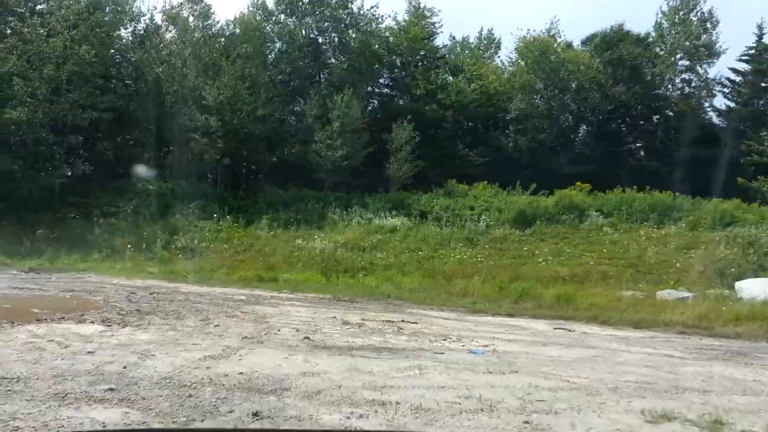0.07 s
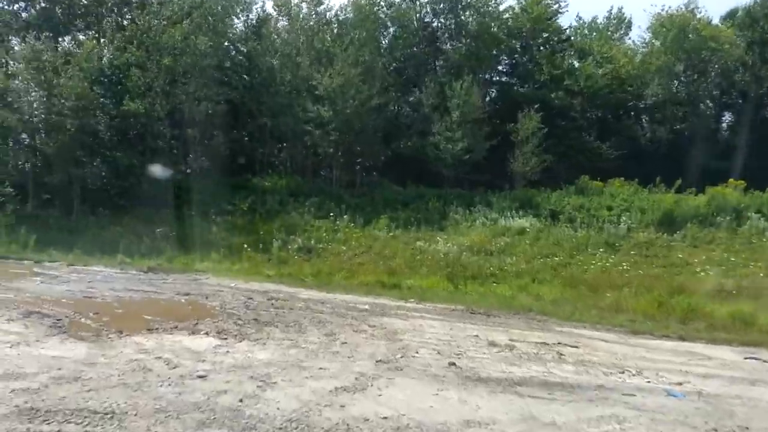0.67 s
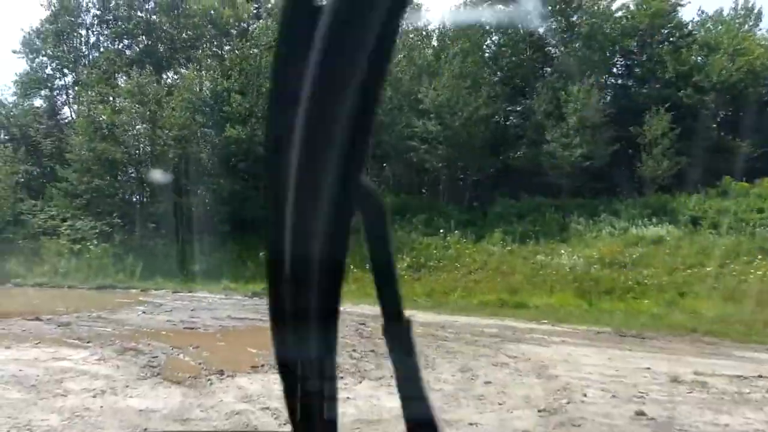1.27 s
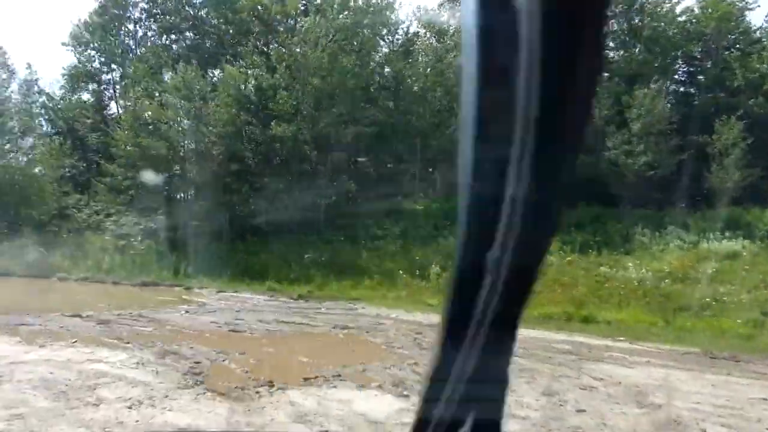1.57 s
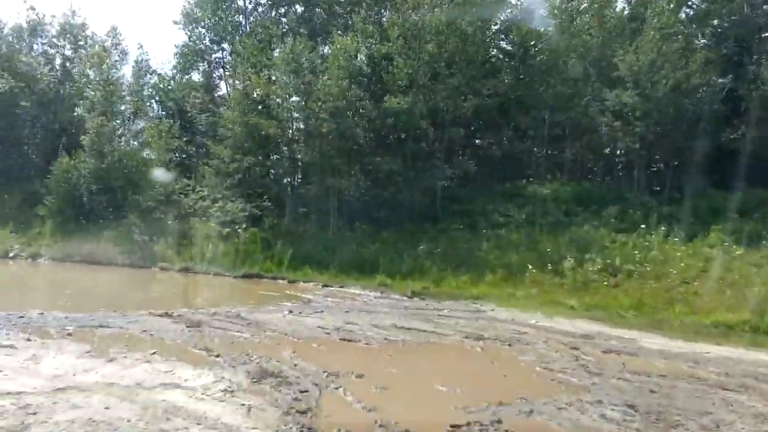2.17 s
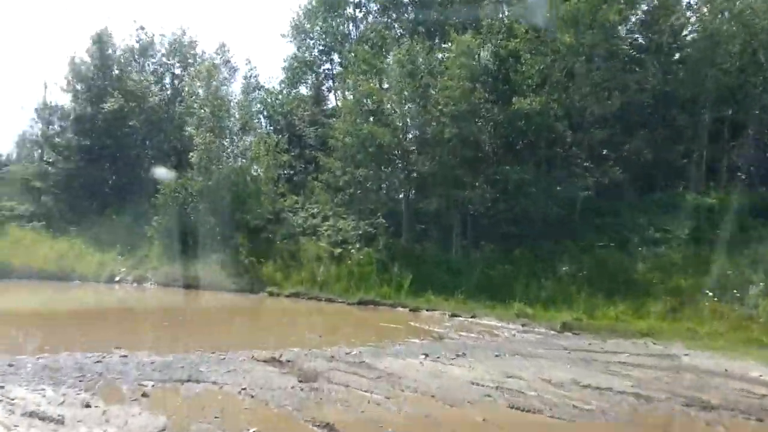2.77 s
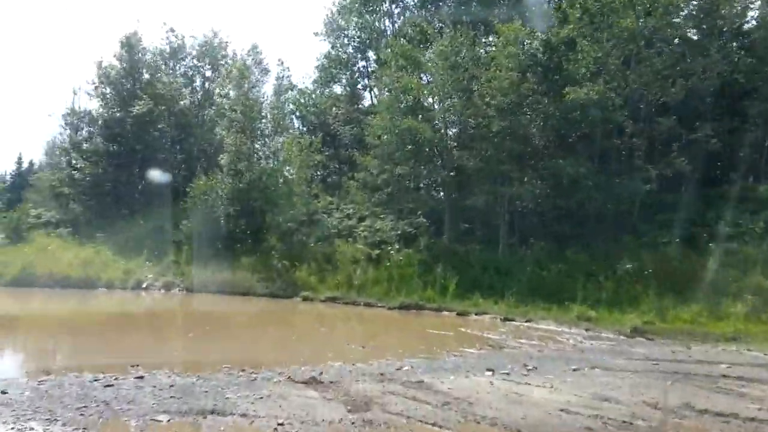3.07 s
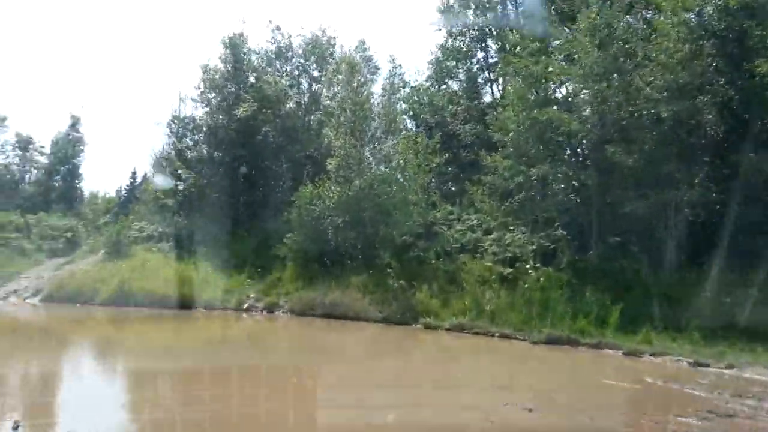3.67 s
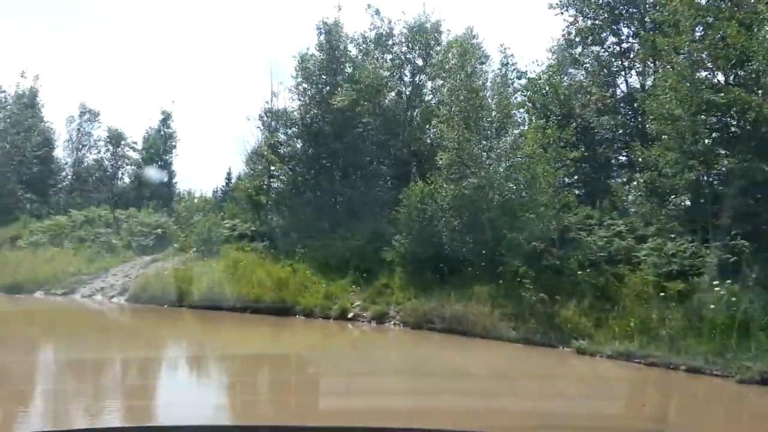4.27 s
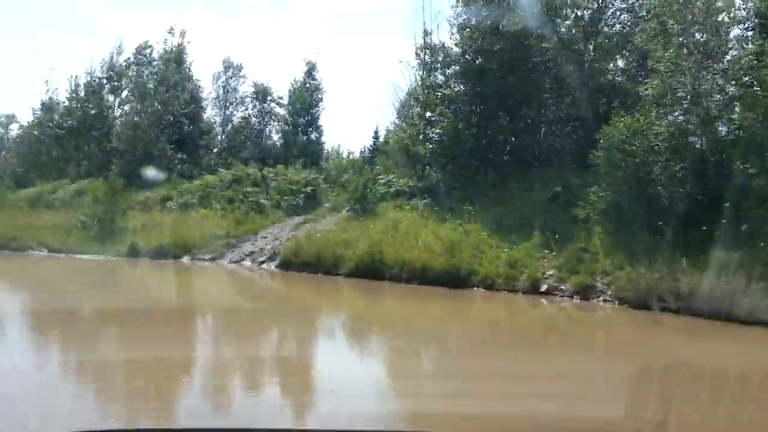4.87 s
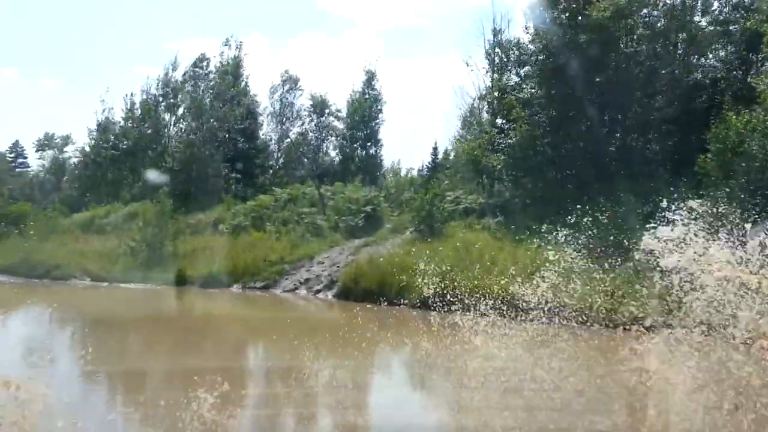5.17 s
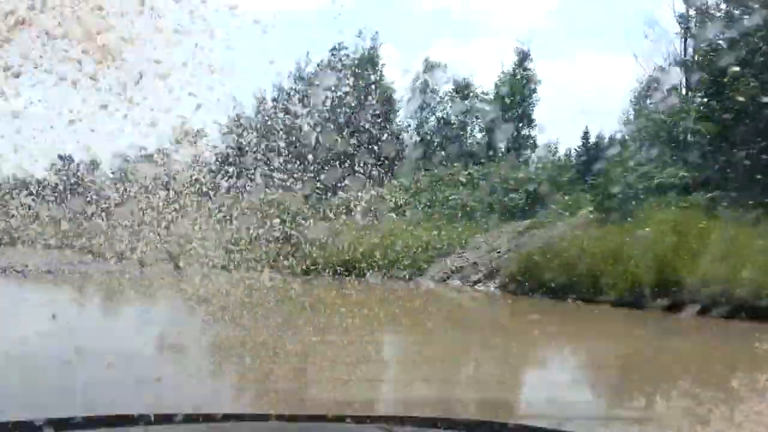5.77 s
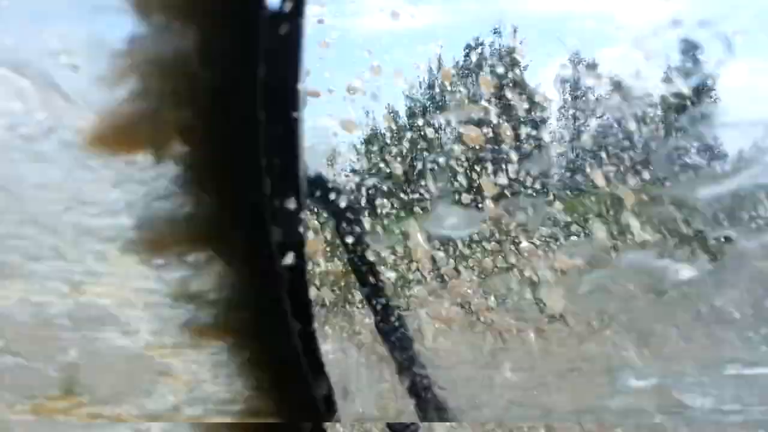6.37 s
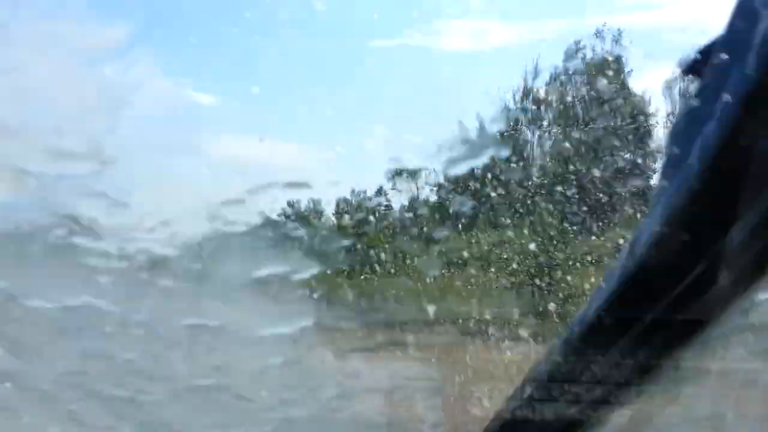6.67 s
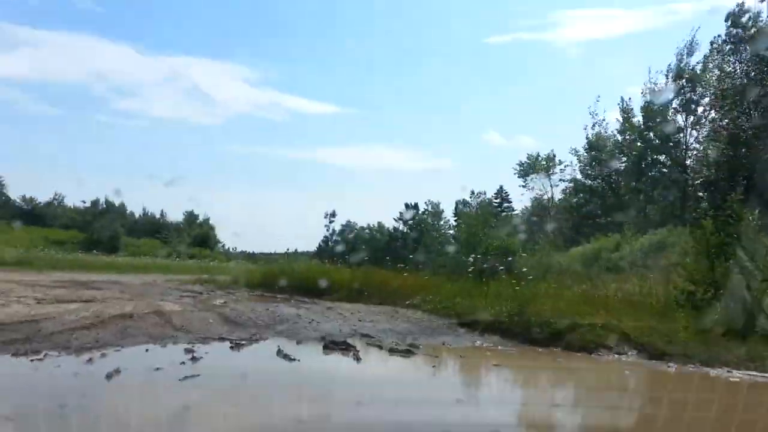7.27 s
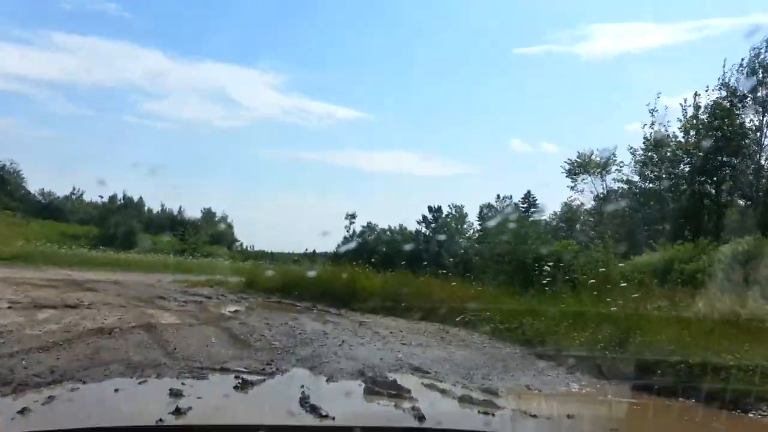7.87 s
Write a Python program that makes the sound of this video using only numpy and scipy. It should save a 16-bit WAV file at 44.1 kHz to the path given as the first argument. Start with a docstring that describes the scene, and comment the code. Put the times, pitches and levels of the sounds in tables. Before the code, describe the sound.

An off-road vehicle hums, rumbles and rattles along a dirt track, heard from inside, then splashes through a muddy puddle that splatters the windscreen.

```python
"""Inside the cab of an off-road vehicle on a rough dirt track. After a short silence the drive cuts in: the
engine hums, tyres rumble and crunch, blows thump the floor and loose trim rattles. A small motor whines
faintly, and twice its tone jumps up into a squeal. Just after five seconds, with a creak, the wheels plunge
into a muddy puddle: water slams the floor, spray rains on the body, gobs splat on the windscreen, and the
engine drones under load as it pulls through."""
import sys
import numpy as np
from scipy import signal
from scipy.fft import rfft, irfft, next_fast_len
from scipy.io import wavfile

SR = 44100
rng = np.random.default_rng(int(sys.argv[2]) if len(sys.argv) > 2 else 0)


def dump(signal):
    """Clip the signal to [-1, 1] and save it as 16-bit WAV at the path in sys.argv[1]."""
    limited = np.clip(np.atleast_2d(signal).T, -1, 1)
    pcm = np.round(limited * 32767).astype(np.int16)
    wavfile.write(sys.argv[1], SR, pcm)


N = 348831
TIME = np.arange(N) / SR
BODY_LEFT_DB = -0.33   # the floor and the engine sit a touch to the right

# Hollow colour of the drummed floor and cab: frequency_hz, level_db
DRUM_COLOUR = [(50, -73), (110, 0), (170, -3.5), (255, -4.5), (340, -4), (400, -9.5), (500, -8.5),
               (700, -15.5), (1000, -18.5), (1600, -26.5), (4000, -31.5)]
# Bright colour of a hard tick: frequency_hz, level_db
TICK_COLOUR = [(3000, 4.5), (5300, 4.5), (6500, -2.5), (8500, -2), (10500, -4.5), (14500, -8)]


def from_db(db):
    """Decibels to gain."""
    return 10 ** (np.asarray(db) / 20)


def pan(left_db):
    """Stereo gains that put the left channel left_db above the right."""
    return from_db([[left_db / 2], [-left_db / 2]])


def rms_one(x):
    """Scale to unit power."""
    return x / np.sqrt(np.mean(x ** 2) + 1e-20)


def curve(points):
    """Automation: straight lines through (time, value) points."""
    return np.interp(TIME, *np.transpose(points))


def held(start_s, length_s, attack_s, release_s):
    """Rise, hold and release between 0 and 1."""
    return np.clip(np.minimum((TIME - start_s) / attack_s, (start_s + length_s - TIME) / release_s), 0, 1)


def decay(t60, size, attack_s=1e-6):
    """Percussive envelope: a rise, and a fall of 60 dB in t60 seconds."""
    return from_db(-60 * TIME[:size] / t60) * (1 - np.exp(-TIME[:size] / attack_s))


def drift(rate_hz):
    """Smooth random wander of spread 1."""
    step, settle = 40, 2000
    pole = np.exp(-2 * np.pi * rate_hz * step / SR)
    white = rng.standard_normal(N // step + settle + 2)
    slow = signal.lfilter([1], [1, -2 * pole, pole * pole], white)[settle:]
    return np.interp(np.arange(N) / step, np.arange(len(slow)), rms_one(slow))


def noise(size=N):
    """Two unrelated white noises."""
    return rng.standard_normal((2, size))


def add(out, start_s, sound):
    """Mix a sound in at a time."""
    i = min(round(start_s * SR), N)
    out[:, i:i + sound.shape[-1]] += sound[..., :N - i]


def in_cab(pair, colour, mic_spacing_m=0.16):
    """Colour two unrelated signals into a diffuse field, centred in the bass and wide on top; rms 1."""
    size = next_fast_len(pair.shape[1], True)
    hz = np.maximum(np.arange(size // 2 + 1) * SR / size, 1)
    points_hz, points_db = np.transpose(colour)
    gain = from_db(np.interp(np.log(hz), np.log(points_hz), points_db))
    gain /= 1 + (hz / points_hz[-1]) ** 4 + (points_hz[0] / hz) ** 4   # roll off both ends
    coherence = .98 * np.sinc(2 * hz * mic_spacing_m / 343)
    spectrum = rfft(pair, size) * gain * np.sqrt([1 + coherence, 1 - coherence])
    mid, side = irfft(spectrum, size)[:, :pair.shape[1]]
    return rms_one(np.array([mid + side, mid - side]))


def grains(per_s, spread_db, t60, size=1536, panels=8):
    """Random small impacts of uneven strength, dealt to several briefly ringing panels; rms 1."""
    strength = from_db(spread_db * np.minimum(rng.exponential(1, N), 4)) * rng.choice([-1, 1], N)
    hits = strength * (rng.random(N) < per_s / SR) / np.sqrt(per_s)
    panel, out = rng.integers(0, panels, N), 0
    for k in range(panels):
        ring = noise(size) * decay(t60, size)
        out += signal.oaconvolve([hits * (panel == k)], ring, axes=1)[:, :N]
    return rms_one(out)


def pings(per_s, low_hz, high_hz, cycles, pitches=20):
    """Random pitched taps that ring for some cycles, scattered in stereo; rms 1."""
    taps = (rng.random(N) < per_s / SR) * from_db(3.4 * np.minimum(rng.exponential(1, N), 3))
    pitch, out = rng.integers(0, pitches, N), 0
    scattered = taps * rng.uniform(-0.97, 1, (2, N))
    for k, hz in enumerate(np.geomspace(low_hz, high_hz, pitches)):
        pole, angle = from_db(-60 * hz / (cycles * SR)), 2 * np.pi * hz / SR
        resonator = [0, np.sin(angle)], [1, -2 * pole * np.cos(angle), pole * pole]
        out += signal.lfilter(*resonator, scattered * (pitch == k) + 1e-18)
    return rms_one(out)


def struck(modes, size, pitch_scale=1):
    """Modes that ring down, each with a new strength for every touch and channel."""
    out = 0
    for pitch, db, t60 in modes:
        ring = np.sin(2 * np.pi * pitch * pitch_scale * TIME[:size]) * decay(t60, size, attack_s=0.00065)
        out += from_db(db) * rng.uniform(-1.35, 1.63, (2, 1)) * ring
    return out


def thin_tone(hz, waver, flicker_db):
    """A sine, unsteady in pitch and level, with its own phase in each channel."""
    phase = 2 * np.pi * np.cumsum(hz * (1 + waver * drift(30.6))) / SR
    level = np.sqrt(2) * from_db(flicker_db * drift(16))
    return level * np.sin(phase + rng.uniform(0, np.pi / 2, (2, 1)))


def motor_whine(gripping):
    """A small electric motor whines faintly; its tone gives way while it jumps up into the squeals, and dips
    under the creak."""
    # Partials of the motor: pitch_hz, level_db, duck_db
    partials = [(1716, -70, -4), (2026, -62, -16), (2340, -72, -5), (2680, -65.5, -5)]
    # Swell of the whine: time_s, gain_db
    swell = [(.8, -14), (1.4, 9), (2.3, 14.5), (3.15, 13.5), (3.8, 5), (7.9, 9.5)]
    whine = sum(from_db(db + duck_db * gripping) * thin_tone(hz, waver=0.0042, flicker_db=3)
                for hz, db, duck_db in partials)
    return from_db(curve(swell)) * whine


def squeals(sag_hz=65):
    """The motor's tone jumps up into squeals, and a part creaks: each catches, glides and sags in pitch as it
    lets go; returns the sound and its grip."""
    # Two squeals and a creak: start_s, length_s, pitch_hz, glide_hz_per_s, full_grip_db, waver_share
    rubs = [(2.357, 0.28, 2168, -120, -42, 0.00494), (2.8, 0.53, 2130, -65, -42, 0.0066),
            (5.204, 0.05, 713, 1602, -18.5, 0.0225)]
    out, gripping = 0, 0
    for start_s, length_s, hz, glide, db, waver in rubs:
        grip = held(start_s, length_s, attack_s=0.0394, release_s=0.048)
        pitch_hz = hz + glide * np.clip(TIME - start_s, 0, length_s) - sag_hz * (1 - grip)
        out += from_db(db) * grip * thin_tone(pitch_hz, waver, flicker_db=1.3)
        gripping = np.maximum(gripping, grip)
    return out, gripping


def engine():
    """The firing tone grows with load and near the cab's resonance; uneven firing makes it flutter."""
    # Engine speed: time_s, firing_hz
    speed = [(.95, 87), (1.42, 105.5), (2.35, 110), (2.65, 108), (3.35, 117), (3.72, 106.3), (4.52, 99),
             (4.9, 111.5), (5.3, 117), (5.55, 114), (5.85, 129.5), (6.12, 129.7), (6.4, 135), (6.7, 129.8),
             (6.92, 124), (7.28, 139), (7.55, 140.5), (7.88, 121)]
    # Engine load, as the firing tone before the cab's boost: time_s, level_db
    load = [(.9, -35), (1.3, -32.5), (2.4, -37.5), (2.95, -38), (3.7, -33.5), (4.0, -30.5), (5.25, -36),
            (5.55, -25), (5.72, -30), (5.86, -25), (6.2, -21.5), (6.65, -25.5), (6.95, -25), (7.2, -27),
            (7.38, -26), (7.9, -31)]
    # Overtones at mean load: firing_multiple, level_db
    overtones = [(2, -32), (2.5, -36.5), (3, -36), (3.5, -43), (4, -41), (5, -47)]
    cab_hz, cab_half_width_hz, cab_boost_db = 126.4, 14.8, 10.5
    firing_hz, load_db = curve(speed), curve(load)
    boom_db = cab_boost_db / (1 + ((firing_hz - cab_hz) / cab_half_width_hz) ** 2)
    phase = 2 * np.pi * np.cumsum(firing_hz * (1 + 0.00333 * drift(6.8))) / SR
    out = from_db(load_db + boom_db + 0.57 * drift(4.6)) * np.sin(phase)
    hum_db = 0.3 * (load_db - load_db.mean())   # overtones follow only part of the load's swing
    for multiple, db in overtones:
        flutter_db = 2 * drift(4.7)
        out += from_db(db + hum_db + flutter_db) * np.sin(multiple * phase + rng.uniform(0, 2 * np.pi))
    return out


def tyres(wading, spray):
    """Ruts boom through the body, the tread rumbles, grit and flung mud crunch and hiss, pebbles tap."""
    # Depth of the ruts, as the body's boom: time_s, level_db
    ruts = [(.8, -41), (1.9, -41), (2.6, -36.5), (3.1, -33), (3.72, -31.5), (4.12, -34), (4.38, -43),
            (4.7, -38), (5.6, -31), (5.85, -36), (6.4, -30), (7.1, -35.5), (7.28, -26.5), (7.74, -41),
            (7.88, -38)]
    # How hard the ground shakes the body: time_s, level_db
    shake = [(.8, -44.5), (1.9, -42.5), (2.6, -39.5), (3.1, -33.5), (3.72, -34.5), (4.15, -38.5),
             (4.42, -44), (4.68, -33), (5.0, -30.5), (5.5, -28), (5.9, -32), (6.45, -28), (7.05, -43),
             (7.33, -28), (7.7, -44)]
    # Looseness of the gravel, as its hiss: time_s, level_db
    gravel = [(.8, -36.5), (1.2, -38), (1.6, -36.5), (2.25, -36.5), (2.65, -36.6), (3.2, -36.5),
              (3.55, -35.2), (3.85, -36.5), (4.4, -36.5), (4.7, -35.5), (5.0, -35.5), (5.8, -36.5),
              (7.9, -36)]
    # Deep boom of the body: frequency_hz, level_db
    boom_colour = [(20, -50), (32, -42), (42, -22), (54, -12), (80, -12.5), (105, -37), (140, -39),
                   (250, -58)]
    # Rumble of the tread: frequency_hz, level_db
    rumble_colour = [(50, -27), (95, -3), (130, -2), (168, -6.5), (210, -1.3), (245, -0.2), (295, -4.5),
                     (335, -2.5), (420, -7.5), (560, -10.5), (760, -13), (1000, -20), (1600, -29.5),
                     (4000, -53)]
    # Crunch of the grit: frequency_hz, level_db
    grit_colour = [(400, 4), (900, -5), (1250, 0), (1550, -0.5), (2200, -1.5), (3200, -6), (4500, -7.5),
                   (5800, -12.5), (8200, -12.5), (10000, -18.5), (11000, -22.5), (12000, -28.5),
                   (15000, -50)]
    usual_shake_db, cushion_db, mud_db = -34, -0.5, -11   # water cushions the tread; spray carries mud
    bumps_db = drift(7.7)
    boom = from_db(curve(ruts)) * in_cab(noise(), boom_colour)
    rumble_db = -22 + 0.24 * (curve(shake) - usual_shake_db) + cushion_db * wading + bumps_db
    rumble = from_db(rumble_db) * in_cab(noise(), rumble_colour)
    grit_gain = np.hypot(from_db(curve(gravel) + 0.49 * bumps_db), from_db(mud_db) * spray)
    crunch = noise() + from_db(-6 + 1.7 * drift(15)) * grains(per_s=400, spread_db=3.5, t60=0.032)
    pebbles = from_db(-12.8) * pings(per_s=170, low_hz=1600, high_hz=5300, cycles=27)
    return (boom + rumble) * pan(BODY_LEFT_DB) + grit_gain * (in_cab(crunch, grit_colour) + pebbles)


def knock(ring_db, clack_db, tick_db, part_hz, size):
    """One touch of loose trim: a dull clack, plus a metallic ring and a tick that open with a crack."""
    # Dull clack of the trim: frequency_hz, level_db
    clack_colour = [(300, 4), (600, 14.5), (850, 1.5), (1200, 7.5), (1600, 3), (2050, 4), (2600, -7),
                    (2880, -8), (3150, 1.5), (5000, -24)]
    # Modes that stand out of the clack: pitch_ratio, level_db, t60_s
    trim_modes = [(.525, -7.5, .09), (.72, -8, 0.07), (.79, -8.5, 0.085), (.9, -9, 0.051), (.98, -4, .05),
                  (1.005, -6.5, 0.048), (1.04, -2.5, 0.047)]
    # Metallic sheen of the ring: frequency_hz, level_db
    ring_colour = [(1200, -22), (2500, -24), (2950, 11), (3300, 6), (3800, 7), (4150, 6.5), (4800, 5.5),
                   (5500, -2.5), (8000, -3.5), (9800, -9), (12000, -37)]
    # Metal fittings that the trim strikes: pitch_hz, level_db, t60_s
    metal_modes = [(2943, -3.5, 0.072), (3000, -5, 0.082), (3610, -13, .07), (3980, -9, .07),
                   (4450, -10, .07), (4760, -6, .07), (5200, -10, .06)]
    crack = from_db(-3.5) * decay(0.013, size, attack_s=0.0002)
    clack = in_cab(noise(size), clack_colour) * decay(0.13, size, attack_s=0.00091)
    clack += struck(trim_modes, size, part_hz)
    ring = in_cab(noise(size), ring_colour) * (decay(0.1, size, attack_s=0.00063) + crack)
    ring += struck(metal_modes, size)
    tick = in_cab(noise(size), TICK_COLOUR) * (decay(0.06, size) + crack)
    return from_db(clack_db - 0.55) * clack + from_db(ring_db - 1.25) * ring + from_db(tick_db) * tick


def rattles(size=4096, bounce_db=-9, snap_s=7.5575):
    """Loose parts knock and bounce once, weaker; near the end one hard tick snaps close by."""
    # Knocks of loose trim and stones: start_s, ring_db, clack_db, tick_db, pitch_hz
    knocks = [(.849, -45, -37, -38, 2600), (0.888, -47, -48, -35, 2600), (1.1821, -33.5, -27.5, -35, 2080),
              (1.2566, -29, -27, -39, 2270), (1.402, -38, -42, -41, 2580), (1.517, -31, -27.5, -48, 2670),
              (1.557, -34, -26, -29, 2040), (1.992, -32, -52, -34, 2600), (2.1555, -40, -35, -39, 2620),
              (2.2918, -40, -26, -60, 2500), (2.4076, -41, -26, -59, 2500), (2.857, -36, -31, -40, 2300),
              (3.0327, -29.5, -23, -28.5, 2220), (3.1975, -32.5, -21.5, -52, 2570),
              (3.3712, -34, -29.5, -37, 2610), (3.4705, -32, -18.5, -48, 2560),
              (3.688, -35, -31, -55, 2800), (3.7147, -37, -25, -56, 2370), (3.733, -39, -26, -57, 2700),
              (4.036, -37, -27, -58, 2480), (4.078, -34, -30, -43, 2580), (4.12, -45, -42, -37, 2600),
              (4.157, -37, -35, -48, 2600), (4.5756, -32, -24, -39, 2500), (4.5844, -36, -28, -35, 2390),
              (4.6418, -28.5, -32, -55, 2740), (4.79, -30.5, -42, -57, 2700), (4.9078, -35, -27, -32, 2650),
              (4.9357, -32, -27.5, -49, 2710), (5.305, -34, -24.5, -35, 2280),
              (5.6073, -25, -31, -30, 2600), (5.6524, -29, -24.5, -32.5, 2530),
              (5.752, -28.5, -26, -27, 2390), (6.015, -23, -25, -34, 2680), (6.202, -27, -26, -28, 2600),
              (6.2104, -32, -28, -31, 2490), (6.3216, -20.5, -26, -39, 2530),
              (6.5086, -31, -24.5, -28, 2580), (7.058, -28, -27, -36, 2600), (7.1933, -20, -26, -30, 2710),
              (7.209, -33, -40, -29, 2580), (7.329, -29, -24, -28, 2660), (7.428, -31, -30, -32, 2610),
              (7.449, -27, -18.5, -44, 2440), (7.572, -34, -21, -52, 2530), (7.598, -35, -30, -52, 2500),
              (7.622, -36, -24, -54, 2410), (7.641, -34, -32, -54, 2530), (7.664, -38, -28, -46, 2490),
              (7.7096, -43, -26, -58, 2530), (7.729, -46, -33, -58, 2470), (7.7724, -39, -30, -40, 2600)]
    out = np.zeros((2, N))
    for start_s, *touch in knocks:
        bounce_s = start_s + rng.uniform(.006, .016)
        add(out, start_s, knock(*touch, size))
        add(out, bounce_s, from_db(bounce_db) * knock(*touch, size))
    snap_envelope = decay(0.0045, size) + from_db(-16) * decay(0.067, size)
    add(out, snap_s, from_db(-13.5) * in_cab(noise(size), TICK_COLOUR) * snap_envelope)
    return out * pan(left_db=2.5)


def thumps(size=6000, rise_s=0.0035):
    """Each blow sets the floor ringing briefly, and the cab answers."""
    # Heavy blows on the floor and suspension: start_s, level_db, pitch_hz
    blows = [(1.256, -21, 258), (1.517, -8, 322), (1.517, -14, 566.5), (1.521, -24, 805),
             (1.581, -9.5, 278), (2.293, -9.5, 249), (2.853, -8.5, 344.6), (3.04, -16, 579),
             (3.446, -12, 280), (3.72, -14, 81), (4.905, -8.5, 134), (5.326, -2.5, 224), (5.342, -5, 286),
             (5.374, -4, 270), (5.395, -4, 254), (5.422, 3, 271), (5.442, -3, 205), (5.584, 6.5, 273),
             (5.606, -9, 245), (5.62, -10, 360), (5.755, -14, 634), (6.2, -4, 225), (6.374, -2, 279),
             (6.401, -1.5, 252), (6.416, -2, 269), (6.43, -10, 254), (7.39, -17, 244), (7.46, -7, 312),
             (7.251, -15, 76), (7.477, -4.5, 263)]
    # Modes of the struck floor: pitch_ratio, level_db, t60_s
    floor_modes = [(.63, -3, .075), (1, 6, 0.05), (1.25, -8, 0.06), (1.62, -20, 0.055), (2.9, -12.5, 0.026)]
    out, t = np.zeros((2, N)), TIME[:size]
    rise = 1 - np.exp(-(t / rise_s) ** 2)
    for start_s, db, hz in blows:
        floor = sum(from_db(mode_db) * np.sin(2 * np.pi * hz * ratio * t) * decay(t60, size)
                    for ratio, mode_db, t60 in floor_modes)
        cab = from_db(-18) * in_cab(noise(size), DRUM_COLOUR) * decay(0.08, size)
        add(out, start_s, from_db(db) * rise * (floor + cab))
    return out


def spray_gains():
    """Envelopes of the spray on the body and on the glass: each surge swells to a crest and drains."""
    # Surges of water thrown over the body: crest_s, rise_s, fall_s, level_db, glass_share_db
    surges = [(5.08, 0.084, 0.047, -36.5, -2), (5.36, 0.021, 0.024, -30, -3), (5.568, 0.23, 0.17, -29, -28),
              (5.78, 0.048, 0.023, -32, -2), (5.99, 0.28, 0.024, -36.5, -3),
              (6.39, 0.13, 0.095, -23.5, 0.5), (6.57, 0.03, 0.13, -34.5, -3.5), (6.8, 0.15, 0.13, -49, -10),
              (7.01, 0.17, 0.029, -40.5, -16.5), (7.399, 0.11, 0.17, -26.5, -19.5),
              (7.61, 0.032, 0.056, -32, -21)]
    body_power = glass_power = 1e-12
    for crest_s, rise_s, fall_s, db, glass_share_db in surges:
        from_crest = np.maximum((crest_s - TIME) / rise_s, (TIME - crest_s) / fall_s)
        surge = from_db(db) * np.exp(-np.minimum(from_crest, 20))
        body_power += surge ** 2
        glass_power += (from_db(glass_share_db) * surge) ** 2
    return np.sqrt(body_power), np.sqrt(glass_power)


def windscreen(spray, size=3072):
    """Drops burst on the glass, the fatter ones with a pitched tap; big gobs land as separate splats."""
    # Drops bursting on glass: frequency_hz, level_db
    glass_colour = [(1200, -25), (2200, 7), (3500, 2), (4200, 7), (6200, -4.5), (8500, -7.5), (10500, -13),
                    (14000, -32)]
    # Gobs of muddy water: start_s, level_db, pitch_hz
    gobs = [(5.95, -24.5, 3320), (5.975, -21.5, 3700), (6.115, -30, 3200), (6.2723, -20, 3800),
            (6.351, -20, 4200), (6.373, -24, 2800), (6.386, -25, 3300), (6.413, -27, 2600),
            (6.45, -19, 3000), (6.489, -28, 4300), (6.563, -35, 3100), (6.597, -30, 4300),
            (6.6305, -22, 3900), (6.69, -31, 3000)]
    # Colour of a splat around its pitch: pitch_ratio, level_db
    splat_colour = [(.3, -5), (1, -2), (1.3, -2), (1.7, -16), (2.4, -15), (3.3, -40)]
    bursts = in_cab(grains(per_s=800, spread_db=2, t60=0.016, size=1024, panels=10), glass_colour)
    taps = pings(per_s=340, low_hz=1920, high_hz=4900, cycles=35)
    out = spray * (from_db(-0.5) * bursts + from_db(-11) * taps)
    for start_s, db, hz in gobs:
        colour = [(hz * ratio, colour_db) for ratio, colour_db in splat_colour]
        add(out, start_s, from_db(db) * in_cab(noise(size), colour) * decay(0.06, size, attack_s=0.00043))
    return out


def puddle(wading, spray):
    """Slugs of water drum on the floor; drops patter and ping on the body, denser as the spray grows."""
    # Spray raining on the body: frequency_hz, level_db
    spray_colour = [(400, -26), (850, -3), (1130, 3), (1500, 2), (2000, -2), (2500, -2.5), (3300, -0.5),
                    (4500, -2.5), (6000, -11), (8500, -8.5), (10500, -13.5), (12500, -22), (15000, -50)]
    drum_gain = wading * np.hypot(from_db(-30.5), from_db(-3) * spray ** 0.48)   # steady bed plus surges
    density = (spray / spray.max()) ** 0.65
    slugs = in_cab(grains(per_s=900, spread_db=1, t60=0.031), DRUM_COLOUR)
    patter = grains(per_s=1800 * density, spread_db=3.5, t60=0.027)
    drops = from_db(-2.5) * in_cab(patter + from_db(-19) * noise(), spray_colour)
    splatter = from_db(-11) * pings(per_s=900 * density, low_hz=1634, high_hz=4480, cycles=41)
    return drum_gain * slugs * pan(BODY_LEFT_DB) + spray * (drops + splatter)


def scene():
    """The full mix, as heard behind the windscreen."""
    wading = held(start_s=5.27, length_s=2.77, attack_s=0.033, release_s=0.54)   # wheels in deep water
    body_spray, glass_spray = spray_gains()
    driving = tyres(wading, body_spray) + engine() * pan(BODY_LEFT_DB)
    water = puddle(wading, body_spray) + windscreen(glass_spray)
    impacts = thumps() + rattles()
    friction, gripping = squeals()
    return driving + water + impacts + friction + motor_whine(gripping)


def record(dry):
    """Trim the deepest bass, cut in abruptly, let the biggest blows clip, and take off the very top."""
    low_cut_hz, start_s, high_cut_hz = 23, 0.7825, 15900
    trimmed = signal.sosfilt(signal.butter(3, low_cut_hz, "high", fs=SR, output="sos"), dry)
    clipped = np.clip(trimmed * (TIME >= start_s), -1, 1)
    return signal.sosfilt(signal.cheby2(16, 70, high_cut_hz, fs=SR, output="sos"), clipped)


dry = scene()
out = record(dry)
dump(out)
```